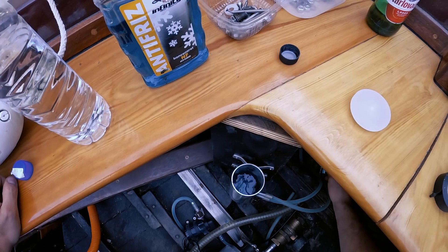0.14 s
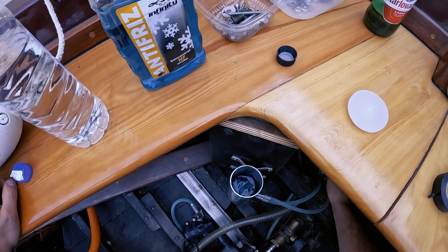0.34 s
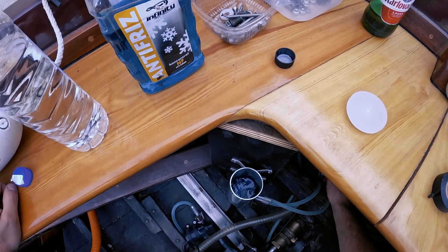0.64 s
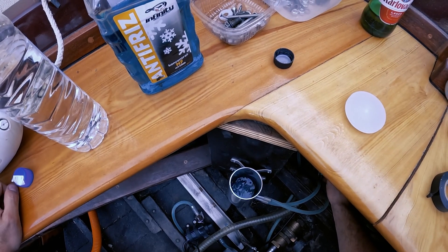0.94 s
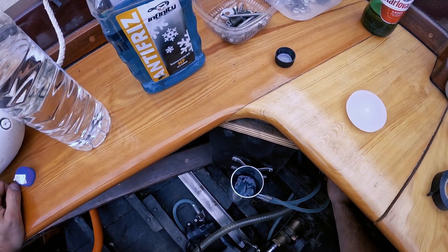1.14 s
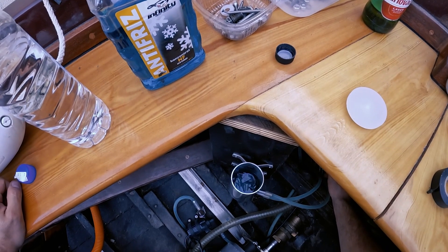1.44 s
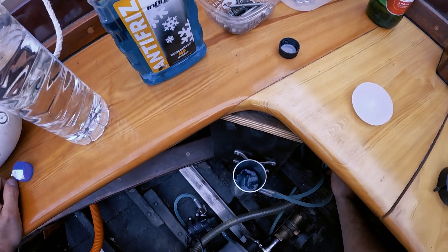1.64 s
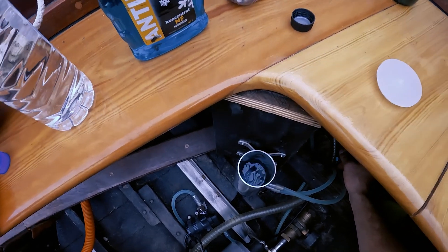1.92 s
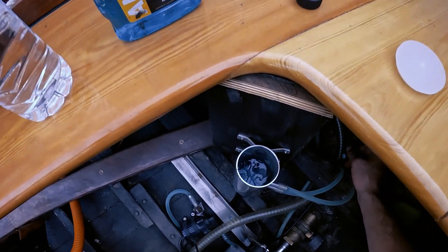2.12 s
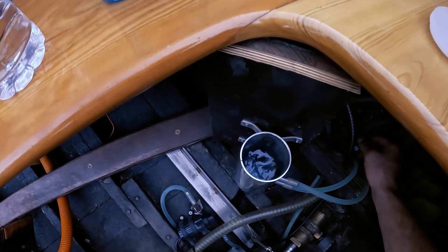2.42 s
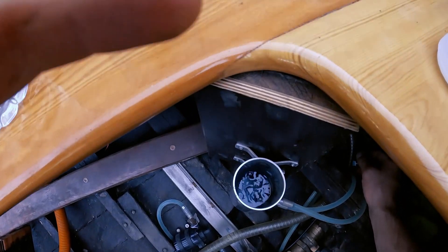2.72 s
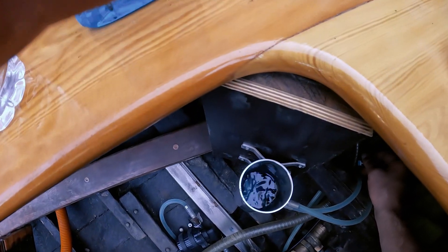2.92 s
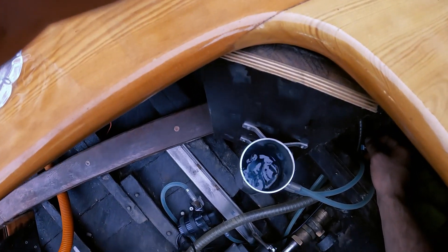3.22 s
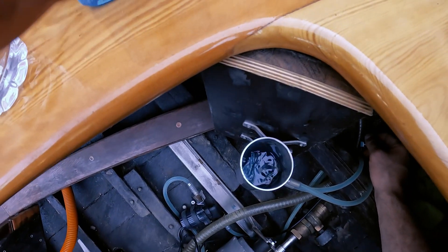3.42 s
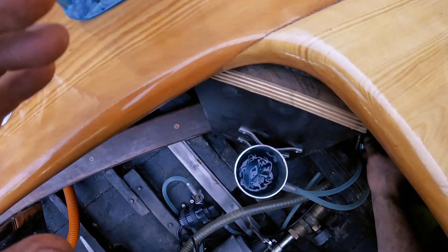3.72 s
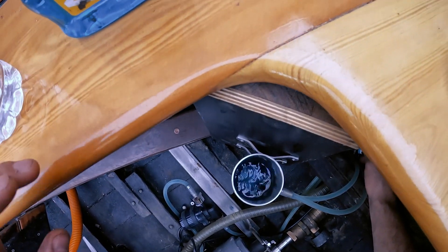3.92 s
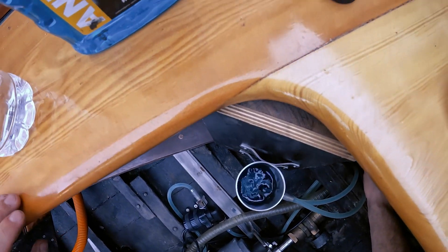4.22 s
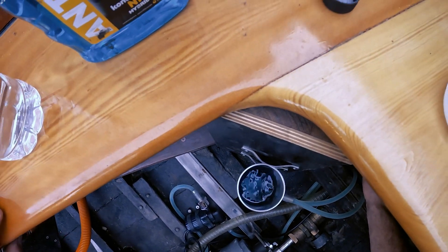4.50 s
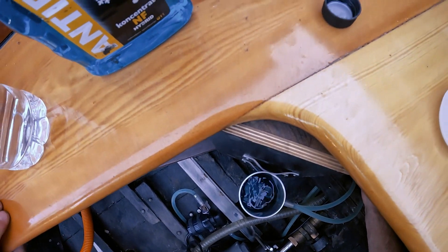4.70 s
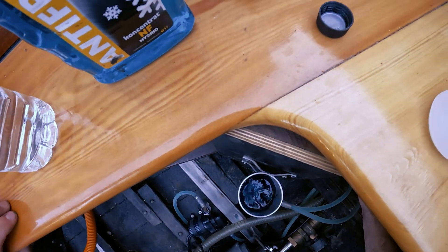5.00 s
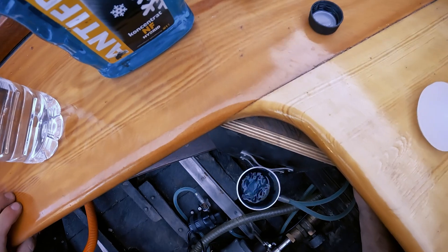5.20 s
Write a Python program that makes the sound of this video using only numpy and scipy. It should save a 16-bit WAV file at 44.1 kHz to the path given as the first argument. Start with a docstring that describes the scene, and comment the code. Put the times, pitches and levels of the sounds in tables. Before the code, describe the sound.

Low pure motor hum with soft rushing coolant; midway, clicks, one strong wooden knock and rough camera handling; pitch sags at the end.

```python
"""A small electric pump circulates coolant under the wooden counter of a boat, and slows at the very end.
Its shaft hums as a pure tone, stronger and steadier in spells; the casing whines on multiples of it.
Noise makes the liquid rush and hiss in the hoses in time with the turns, and the hull drones.
Small parts click, and knocks ring the wood. A hand-held camera leans in over the pump:
fingers bump it (damped swings), rub it (rough noise) and squeak on it (unsteady tones)."""
import sys
import numpy as np
from scipy import signal
from scipy.fft import rfft, irfft
from scipy.io import wavfile
from scipy.ndimage import uniform_filter1d

SR = 44100
rng = np.random.default_rng(int(sys.argv[2]) if len(sys.argv) > 2 else 0)


def int16_out(signal):
    """Quantize to a 16-bit WAV file."""
    q = np.round(np.clip(np.atleast_2d(signal).T, -1, 1) * 32767)
    wavfile.write(sys.argv[1], SR, q.astype(np.int16))


N = 236223
T = np.arange(N) / SR  # time in seconds

RUN_HZ = 133.8  # turns per second at full speed
# At the end the shaft coasts down, and the pump's sound falls as a power of its speed.
COAST_FROM_S, COAST_TIME_S, SPEED_POWER = 5.16, 0.74, 1.75
# Levels of the pump at 1 m and full speed, outside spells and surges; WHINE_DB shifts the whole whine table.
HUM_DB, WHINE_DB, RUSH_DB, HISS_DB = -37.5, -1, -60.5, -66.5
DRONE_DB, RUMBLE_DB = -45, -46.5  # the drone is for 1 m; the rumble ignores distance
TOP_HZ = 15700  # nothing much is heard above this

# Tones of the casing. Each row: multiple of the shaft speed, level in dB before WHINE_DB.
WHINE_TONES = [(2, -67.5), (3, -76.5), (4, -73.5), (5, -80), (7, -78.5), (8, -78), (9, -79.5), (10, -79),
               (12, -70), (14, -73), (16, -84), (18, -80), (20, -84), (21, -103)]
# Tone colour of the rushing liquid. Each row: frequency in Hz, relative level in dB per Hz.
RUSH_SPECTRUM = [(130, -47), (220, -10), (271, -3.5), (338, -11), (397, -8), (500, -13), (543, -8),
                 (568, -13.5), (852, -20), (1040, -15), (1500, -15.5), (1650, -14.5), (1960, -15),
                 (2620, -18), (3500, -32.5), (4550, -66), (7700, -120)]
# Tone colour of the hissing liquid. Each row: frequency in Hz, relative level in dB per Hz.
HISS_SPECTRUM = [(1760, -52), (3000, -23), (3600, -3.5), (4120, 0), (4680, 1), (5110, 4.5), (6290, 1.5),
                 (7650, 1), (8580, -9.5), (9810, -5), (10600, -2.5), (11200, -5), (13700, -13.5),
                 (14200, -21), (15000, -47)]
# Tone colour of the droning hull. Each row: frequency in Hz, relative level in dB per Hz.
HULL_SPECTRUM = [(20, -2.5), (42, -0.5), (65, -4.5), (85, -4.5), (101, -5), (116, 1), (150, -11),
                 (190, -15), (250, -19.5), (330, -36.5), (480, -48)]
# Tone colour of the deep rumble. Each row: frequency in Hz, relative level in dB per Hz.
RUMBLE_SPECTRUM = [(8, 9), (17, 4), (35, -4), (55, -30), (90, -14.5), (200, -63)]
# How much the two ears differ. Each row: frequency in Hz, side minus mid in dB.
WIDTH_CURVE = [(60, -14), (110, -22), (200, 1), (380, -10.5), (700, -5.5), (1290, -7), (2380, -6.5),
               (4400, -8.5), (8120, -9), (15000, -8)]
# How far the sound leans to one ear. Each row: frequency in Hz, left minus right in dB.
LEAN_CURVE = [(60, -5), (110, -3), (200, -2), (380, -1.4), (700, 0.5), (1290, 1.7), (2380, -0.57),
              (4400, -0.15), (8120, 3), (15000, 2.5)]
# Small parts clicking. Each row: start in seconds, level in dB before the soft start, centre in Hz,
# time to fade by 60 dB in seconds, left minus right in dB.
CLICK_EVENTS = [(0.267, -38.5, 5240, 0.013, 0), (0.295, -45, 8000, .02, 2), (1.974, -39.5, 7560, 0.02, 3),
                (2.197, -44, 6940, 0.022, 4), (2.229, -36, 5970, 0.0065, 4), (2.271, -25, 4420, 0.0081, 1),
                (2.317, -22, 3000, 0.022, 2), (2.711, -38.5, 1690, 0.023, 7), (2.823, -52, 1600, 0.03, 3),
                (3.121, -37, 4750, 0.02, 7), (3.5563, -24, 2960, 0.0032, 11), (3.844, -30, 3060, 0.057, 0)]
# Knocks on the wood. Each row: start in seconds, peak level in dB.
KNOCK_EVENTS = [(2.2709, -30), (2.3202, -11.5)]
# Ways the counter rings. Each row: frequency in Hz, relative level in dB, time to fade by 60 dB in seconds.
WOOD_MODES = [(106.8, 4.5, 0.25), (164, -3.5, 0.16), (222, -3, 0.069), (309, -10, 0.11), (365, -8.5, 0.13),
              (523, -25, 0.092), (650, -17, 0.045), (940, -19, 0.13), (1043, -26, 0.12), (1430, -26, 0.09),
              (1570, -18, 0.032), (1905, -12, 0.019), (2080, -28, 0.11), (2800, -19, 0.037)]
# Bumps of the hand on the camera. Each row: start in seconds, peak level in dB before panning, pitch in Hz,
# time to fade by 60 dB in seconds, left minus right in dB.
BUMP_EVENTS = [(2.363, -20.5, 23, 0.17, -2), (2.695, -9, 32, 0.17, -6), (2.739, -9, 22, 0.12, -6),
               (2.826, -14, 36, 0.11, -5), (2.855, -14.5, 14.7, 0.12, -4), (3.125, -16, 132, 0.014, -10),
               (3.144, -20, 33.6, 0.17, -2.5), (3.214, -20.5, 44, 0.085, -2.5),
               (3.5582, -12, 62, 0.0075, -3.5), (3.564, -15, 29, 0.091, -2)]
# Fingers rubbing the case. Each row: peak time, rise and fall in seconds, level in dB, centre in Hz,
# low scrape against the rub in dB, left minus right in dB.
RUB_EVENTS = [(2.28, 0.067, 0.13, -55, 1110, 8, 6), (2.712, 0.015, 0.066, -48, 1520, 3.5, 0),
              (2.823, 0.0033, 0.018, -47, 1490, 2, 3), (2.935, 0.091, 0.063, -61, 7650, 12.5, 19.5),
              (3.001, 0.15, 0.13, -54.5, 1210, -8, -9), (3.085, 0.11, 0.073, -59.5, 5750, 19, 17),
              (3.782, 0.067, 0.039, -45.5, 2950, 1.5, 1), (3.787, 0.031, 0.036, -46, 666, 6, 1),
              (3.852, 0.013, 0.019, -46.5, 1060, 5, 2)]
# Tone colour of the dull scrape. Each row: frequency in Hz, relative level in dB per Hz.
SCRAPE_SPECTRUM = [(70, -34), (170, 5.5), (260, -3.5), (420, -9), (800, -18.5), (1500, -19), (4000, -69)]
# Squeaks of skin on the case. Each row: peak time, rise and fall in seconds, level in dB, pitch in Hz,
# left minus right in dB.
SQUEAK_EVENTS = [(2.185, 0.016, 0.0094, -57, 1050, 4), (2.822, 0.00068, 0.013, -39.5, 1240, -15),
                 (2.845, 0.007, 0.0076, -41.5, 1240, -12), (3.739, 0.039, 0.075, -50.5, 1820, 8),
                 (3.789, 0.038, 0.046, -31.5, 190, -0.5), (3.8, 0.016, 0.0067, -45.5, 1830, 10)]
# Softened treble of clicks, rubs and squeaks. Each row: frequency in Hz, change in dB.
SOFT_EDGE = [(9000, -0.5), (13000, -3), (15500, -12)]
# The camera leans in over the pump and draws back a little. Each row: time in seconds, distance in metres.
CAMERA_DISTANCE = [(0, 1.14), (1.7, 1.01), (2.8, 0.53), (3.5, 0.49), (4.1, 0.78), (5.36, 0.8)]
# Spells of strong, even hum. Each row: start in seconds, end in seconds, strength (1 is full).
# A row that ends before it starts adds nothing.
HUM_SPELLS = [(-0.1, 0.068, 0.53), (0.683, 1.665, 1.0), (1.665, 1.5, -0.57)]
# Surges of the flow. Each row: peak time in seconds, half length in seconds, rise in dB.
FLOW_SURGES = [(0.0, 0.096, 10.5), (0.52, 0.3, 4.5)]
# Air fizzing through the hoses. Each row: peak time in seconds, half length in seconds, level in dB at full speed.
AIR_FIZZES = [(3.42, 0.39, -69), (4.35, 0.071, -66.5), (5.05, 0.077, -62)]
# Shifts of the hand holding the camera. Each row: peak time in seconds, half length in seconds,
# added rumble in dB before panning.
HAND_SHIFTS = [(1.92, 0.04, -39), (2.25, 0.52, -30.5), (2.95, 0.25, -26.5), (3.86, 0.14, -21.5),
               (4.1, 0.16, -28)]
# Resonances of the housing. Each row: frequency in Hz, width in Hz of one filter pass, level in dB at 1 m,
# share of the gain from nearness, dB gained in a full spell.
HOUSING_RESONANCES = [(1593, 73, -76.5, 2, 4), (2590, 340, -77.5, 2.35, -9), (4270, 180, -81, 1.5, 1),
                      (5045, 80, -76, 1.03, -3), (7380, 72, -79.5, 0.53, 3.5),
                      (7830, 65, -92.5, -0.11, 14.5), (9120, 300, -88, 1.3, 8.5),
                      (10550, 580, -76.5, -0.078, 4)]


def undb(db):
    """Turn decibels into gain."""
    return 10 ** (np.asarray(db) / 20)


def curves(table):
    """Join the columns of a table by straight lines in time."""
    s, *columns = np.transpose(table)
    return [np.interp(T, s, column) for column in columns]


def unit(x):
    """Scale to an average strength (rms) of 1."""
    return x / np.sqrt(np.mean(x ** 2))


def decay(t, t60):
    """Fade by 60 dB in t60 seconds."""
    return np.exp(-np.log(1000) * t / t60)


def colour(x, points, share=1):
    """Filter by a curve of (Hz, dB) points."""
    hz, db = np.transpose(points)
    f = np.maximum(np.fft.rfftfreq(x.shape[-1], 1 / SR), 1)
    gain = undb(share * np.interp(np.log(f), np.log(hz), db))
    return irfft(rfft(x) * gain, x.shape[-1])


def resonate(x, hz, width_hz):
    """Favour one pitch region, filtering twice for steep sides."""
    centre_hz = min(hz, SR / 3)
    b, a = signal.iirpeak(centre_hz, centre_hz / min(width_hz, SR / 4), fs=SR)
    return signal.lfilter(b, a, signal.lfilter(b, a, x))


def walk(rate):
    """Drift slowly at random, with new values `rate` times a second and an rms of 1."""
    k = int(SR / rate)
    held = np.repeat(rng.standard_normal(N // k + 1), k)[:N]
    return unit(uniform_filter1d(uniform_filter1d(held, k), k))


def pan(db):
    """Give the gains of the two channels for a left minus right level."""
    return undb(np.array([[db], [-db]]) / 2)


def noise(size, side):
    """Make stereo noise; a larger side weight makes the ears differ more."""
    mid, across = rng.standard_normal((2, size))
    return np.array([mid + side * across, mid - side * across])


def spread(mid, across):
    """Place a sound in the engine bay, with width and lean set for each pitch region."""
    across = colour(across, WIDTH_CURVE)
    left = colour(mid + across, LEAN_CURVE, 1 / 2)
    right = colour(mid - across, LEAN_CURVE, -1 / 2)
    return np.array([left, right])


def add(out, s, sound):
    """Mix a sound in at a time in seconds."""
    i = int(s * SR)
    out[:, i:i + sound.shape[-1]] += sound[..., :N - i]


def swells(table):
    """Add up bell-shaped rises, one for each (peak time, half length, height) row."""
    return sum(height * np.exp(-((T - s) / half_s) ** 2) for s, half_s, height in table)


def swells_of_db(table):
    """Do the same for heights in dB, giving a gain."""
    return swells([(s, half_s, undb(db)) for s, half_s, db in table])


def hull(near_db, spell, near_share=0.82, spell_db=-1.0):
    """The hull drones around its lowest panel resonance, less in a spell; the moving hand adds deep rumble."""
    # the extra points keep the treble out
    drone = unit(colour(noise(N, side=0.19), HULL_SPECTRUM + [(2000, -100)]))
    rumble = unit(colour(noise(N, side=0.16), RUMBLE_SPECTRUM + [(1000, -110)]))
    drone_db = DRONE_DB + near_share * near_db + spell_db * spell
    rumble_gain = undb(RUMBLE_DB) + swells_of_db(HAND_SHIFTS)
    return drone * undb(drone_db) + rumble * rumble_gain * pan(-5.5)


def knocks(contact_s=0.00051, body_db=-13, body_hz=600, body_width_hz=1300, body_t60=0.079):
    """Each blow rings the main modes of the wooden counter and a dense body of weaker ones, made of noise."""
    out, t = np.zeros((2, N)), T[:SR // 2]
    ring = 0
    for k, (hz, db, t60) in enumerate(WOOD_MODES):
        phase = 2 * np.pi * hz * t + rng.normal(0, 0.11, (2, 1))  # slightly different in each ear
        ring = ring + undb(db) * decay(t, t60) * np.sin(phase) * (-1) ** k  # neighbours push opposite ways
    body = unit(resonate(noise(len(t), side=0.49), body_hz, body_width_hz)) * decay(t, body_t60)
    blow = (ring + undb(body_db) * body) * (1 - np.exp(-t / contact_s))
    for s, db in KNOCK_EVENTS:
        add(out, s, blow / np.abs(blow).max() * undb(db))
    return out


def clicks(breadth=1.42, tail_db=-31, tail_t60=0.31, attack_share=0.18):
    """Hard little contacts give a burst of filtered noise, then a faint tail from the cabin."""
    out, t = np.zeros((2, N)), T[:SR // 5]
    for s, db, hz, t60, pan_db in CLICK_EVENTS:
        fade = decay(t, t60) + undb(tail_db) * decay(t, tail_t60)
        attack = 1 - np.exp(-t / (attack_share * t60))  # the shortest clicks also start fastest
        crack = unit(resonate(noise(len(t), side=0.48), hz, breadth * hz))
        add(out, s, crack * attack * fade * undb(db) * pan(pan_db))
    return out


def bumps(softness=0.24):
    """Soft flesh pushes the camera, which swings at a low pitch and soon comes to rest."""
    out, t = np.zeros((2, N)), T[:SR // 2]
    for s, db, hz, t60, pan_db in BUMP_EVENTS:
        push = 1 - np.exp(-(t * hz / softness) ** 2)  # softness is in cycles
        swing = np.sin(2 * np.pi * hz * t) * decay(t, t60) * push
        add(out, s, swing / np.abs(swing).max() * undb(db) * pan(pan_db))
    return out


def pressure(t, rise, fall):
    """A finger presses harder up to time zero, then lets go."""
    return np.exp(-2 * np.abs(t / np.where(t < 0, rise, fall)) ** 2.7)


def rubs(grain_db=3, scrape_pan_db=-4, breadth=1.0):
    """Skin sticks and slips on the case: uneven friction noise in a resonance, over a dull scrape."""
    out, t = np.zeros((2, N)), T[:SR // 2] - 1 / 4
    for s, rise, fall, db, hz, scrape_db, pan_db in RUB_EVENTS:
        slips = undb(grain_db * unit(uniform_filter1d(rng.standard_normal(len(t)), size=90)))
        friction = noise(len(t), side=0.38) * slips
        rub = unit(resonate(friction, hz, breadth * hz)) * pan(pan_db)
        scrape = undb(scrape_db) * unit(colour(friction, SCRAPE_SPECTRUM)) * pan(scrape_pan_db)
        add(out, s + t[0], undb(db) * pressure(t, rise, fall) * (rub + scrape))
    return out


def squeaks(waver=0.07, rough_db=3):
    """Where the slips fall into step, the skin gives a short, unsteady tone, or a judder when it is low."""
    out, t = np.zeros((2, N)), T[:SR // 2] - 1 / 4
    for s, rise, fall, db, hz, pan_db in SQUEAK_EVENTS:
        drift, grip = unit(uniform_filter1d(rng.standard_normal((2, len(t))), size=110))
        phase = 2 * np.pi * np.cumsum(hz * (1 + waver * drift)) / SR
        tone = np.sin(phase) * undb(rough_db * grip)
        add(out, s + t[0], undb(db) * pressure(t, rise, fall) * unit(tone) * pan(pan_db))
    return out


def buzz(turns, ring_s=0.012):
    """The rotor ticks once a turn and rings the housing briefly, as a fading burst of noise."""
    ticks = np.diff(np.floor(turns), prepend=0)
    # share each tick between two samples, so that its timing is exact
    late = np.minimum(turns % 1 / np.gradient(turns), 1)
    ticks = ticks * late + np.roll(ticks * (1 - late), 1)
    t = T[:SR // 30]
    ring = rng.standard_normal((2, len(t))) * np.exp(-t / ring_s)
    return unit(signal.fftconvolve(ticks[None], ring, axes=1)[:, :N])


def coolant(turns, near_db, rush_throb=0.34, hiss_throb=0.19, buzz_share=0.29, flicker_db=1.0,
            rush_near_share=0.78, hiss_near_share=0.75, hiss_surge_share=0.47, fizz_hz=4400, fizz_width_hz=1000):
    """Turbulence in the hoses throbs once a turn and grows with each surge; the rotor's buzz joins the hiss."""
    flow_db = swells(FLOW_SURGES)
    rush_db = RUSH_DB + flow_db + rush_near_share * near_db
    hiss_db = HISS_DB + hiss_surge_share * flow_db + hiss_near_share * near_db
    throb = unit(np.exp(-(turns % 1) / 0.099)) - .5  # jumps up at each turn, then dies away
    rush = rng.standard_normal((2, N)) * (1 + rush_throb * throb)
    hiss = rng.standard_normal((2, N)) * (1 + hiss_throb * throb) + buzz_share * buzz(turns)
    rush = unit(colour(spread(*rush), RUSH_SPECTRUM)) * undb(rush_db + flicker_db * walk(37))
    hiss = unit(colour(spread(*hiss), HISS_SPECTRUM)) * undb(hiss_db)
    fizz = unit(resonate(noise(N, side=0.36), fizz_hz, fizz_width_hz)) * swells_of_db(AIR_FIZZES)
    return rush + hiss + fizz


def housing(turns, near_db, spell, turbulence=0.89, waver_db=0.3):
    """Buzz and turbulence drive narrow resonances, each changing in its own way with nearness and spells."""
    drive = buzz(turns) + turbulence * noise(N, side=0.11)
    out = 0
    for hz, width_hz, db, near_share, spell_db in HOUSING_RESONANCES:
        level_db = db + near_share * near_db + spell_db * spell + waver_db * walk(2.82)
        out = out + unit(resonate(drive, hz, width_hz)) * undb(level_db)
    return out


def undertone(speed, near_db, spell, hz=102, db=-48.5, wander=0.02995, waver_db=3, near_share=0.7):
    """A wavering lower tone beats against the hum, and is silent in a full spell."""
    phase = 2 * np.pi * np.cumsum(hz * speed * (1 + wander * walk(9))) / SR
    level_db = db + waver_db * walk(9.1) + near_share * near_db
    return np.sqrt(2) * np.sin(phase) * undb(level_db) * np.clip(1 - spell, 0, 1)


def settling(ramp_s=0.023):
    """Tell how far the shaft has settled into its strong, even hum."""
    spell = 0
    for start, end, strength in HUM_SPELLS:
        inside_s = np.minimum(T - start, end - T)
        spell = spell + strength * np.clip(inside_s / ramp_s + .5, 0, 1)
    return spell


def pump(turns, near_db, spell, spell_db=8, hum_near_share=0.41, waver_db=1.5, jitter=0.26):
    """Imbalance of the shaft gives a pure hum; the casing sings, wavering, on multiples of its speed."""
    hum_db = HUM_DB + spell_db * spell + hum_near_share * near_db
    hum = np.sqrt(2) * undb(hum_db) * np.sin(2 * np.pi * turns)
    whine = 0
    for order, db in WHINE_TONES:
        phase = 2 * np.pi * (round(order) * turns + rng.random()) + jitter * walk(20)
        arrival = rng.normal(0, 0.44, (2, 1))  # reflections reach each ear at another phase
        whine = whine + np.sqrt(2) * undb(db + waver_db * walk(16)) * np.sin(phase + arrival)
    return hum + undb(WHINE_DB + near_db) * whine


def scene():
    """Mix the hull, the handling and the running pump."""
    speed = np.exp(-np.maximum(T - COAST_FROM_S, 0) / COAST_TIME_S)  # share of full speed
    turns = np.cumsum(RUN_HZ * speed * (1 + 0.000473 * walk(8))) / SR  # turns made so far
    distance_m, = curves(CAMERA_DISTANCE)
    near_db = -20 * np.log10(distance_m)  # gain from nearness, 0 at 1 m
    spell = settling()
    handling = colour(clicks() + rubs() + squeaks(), SOFT_EDGE) + knocks() + bumps()
    running = coolant(turns, near_db) + housing(turns, near_db, spell)
    running = running + undertone(speed, near_db, spell) + pump(turns, near_db, spell)
    return hull(near_db, spell) + handling + running * speed ** SPEED_POWER


def record(dry):
    """The camera weakens the slowest pressure changes, below 6 Hz, and cuts the top."""
    dry = signal.sosfilt(signal.butter(1, 6, "highpass", fs=SR, output="sos"), dry)
    return signal.sosfilt(signal.ellip(8, .2, 70, TOP_HZ, fs=SR, output="sos"), dry)


dry = scene()
out = record(dry)
int16_out(out)
```